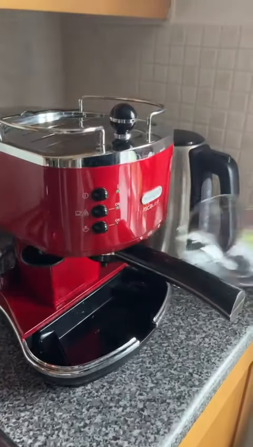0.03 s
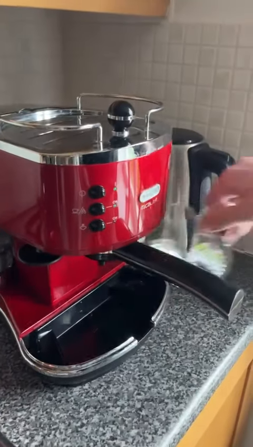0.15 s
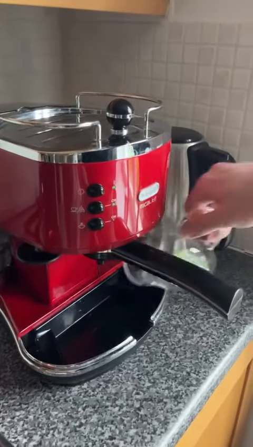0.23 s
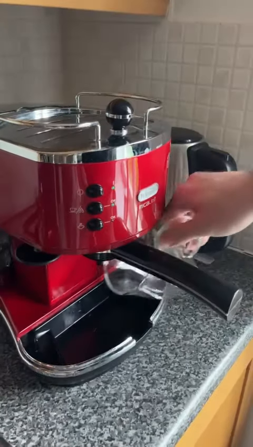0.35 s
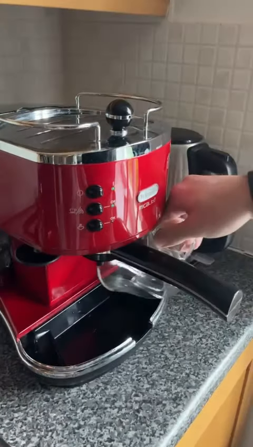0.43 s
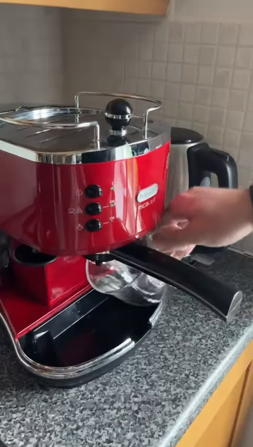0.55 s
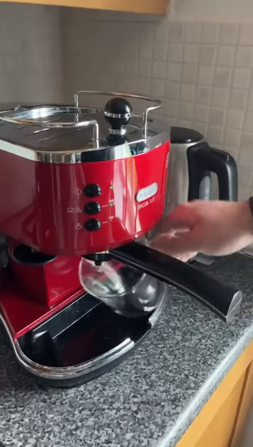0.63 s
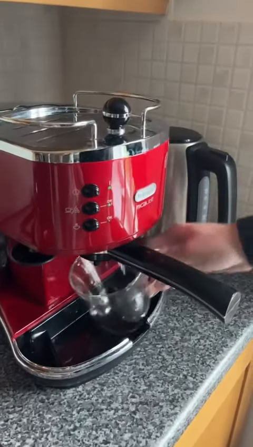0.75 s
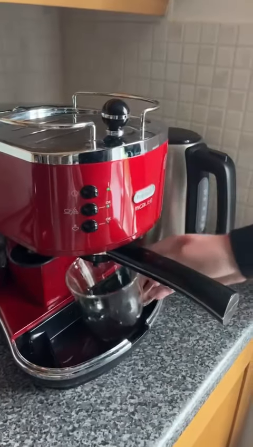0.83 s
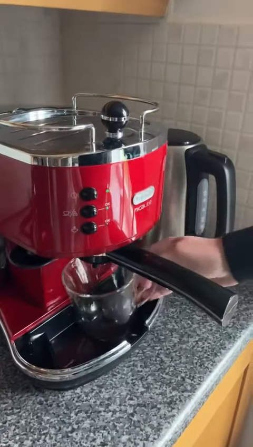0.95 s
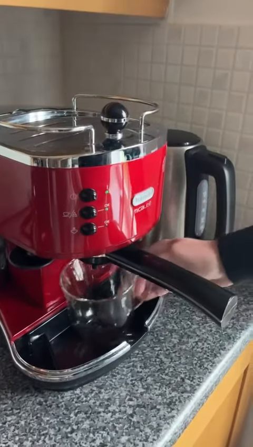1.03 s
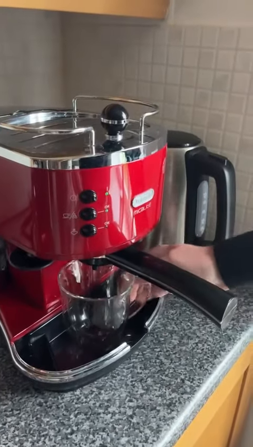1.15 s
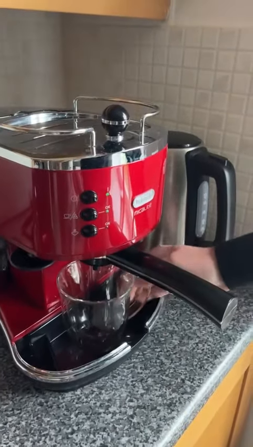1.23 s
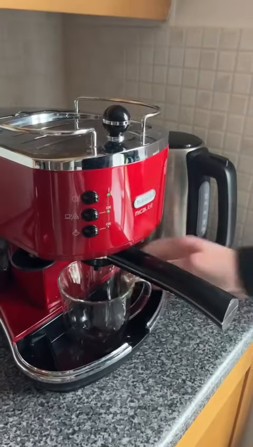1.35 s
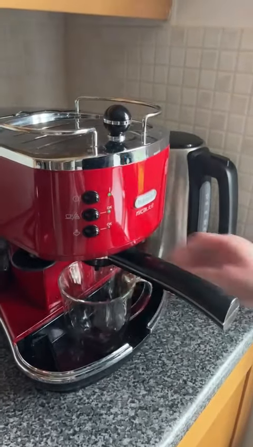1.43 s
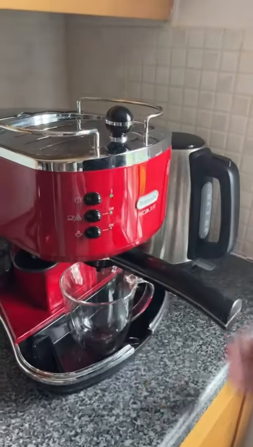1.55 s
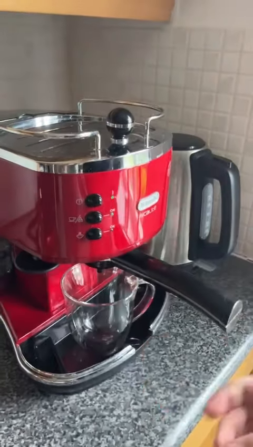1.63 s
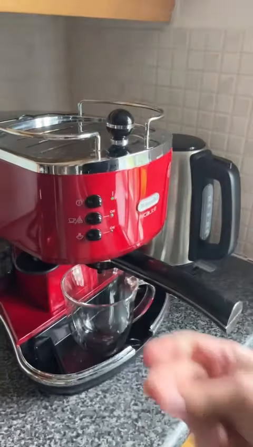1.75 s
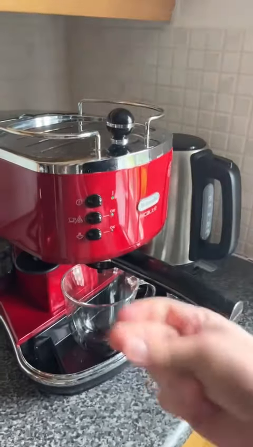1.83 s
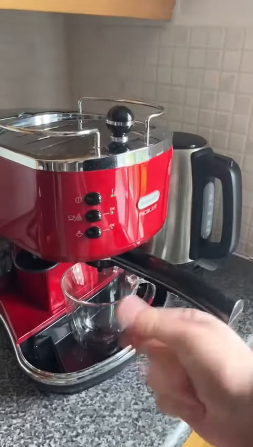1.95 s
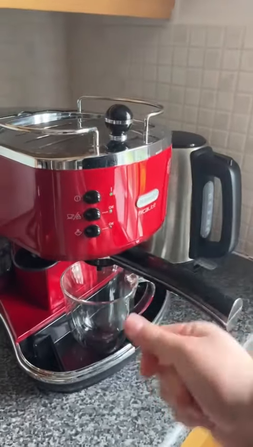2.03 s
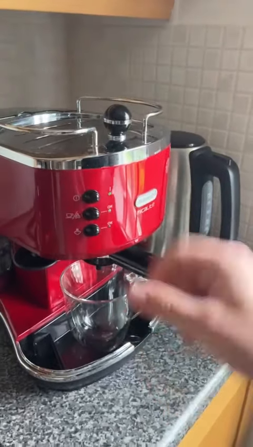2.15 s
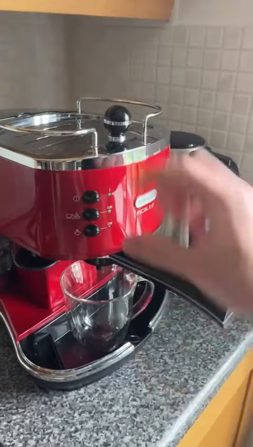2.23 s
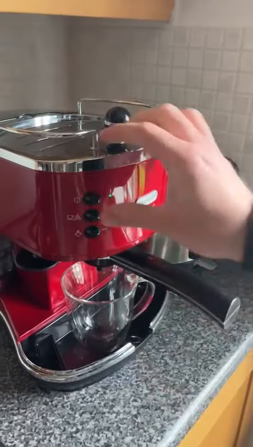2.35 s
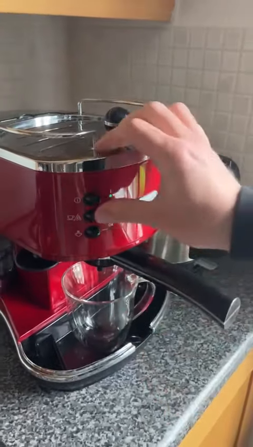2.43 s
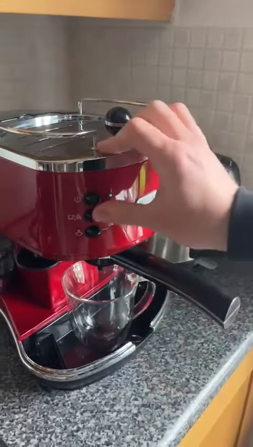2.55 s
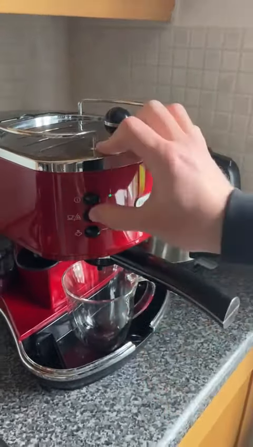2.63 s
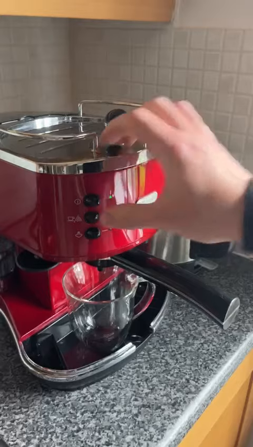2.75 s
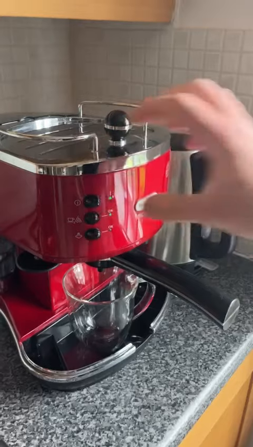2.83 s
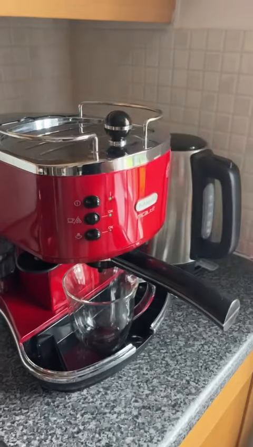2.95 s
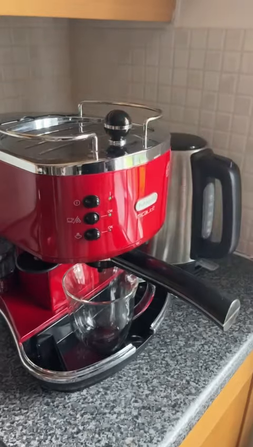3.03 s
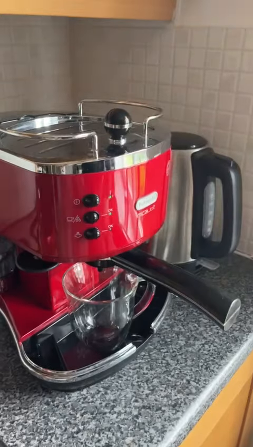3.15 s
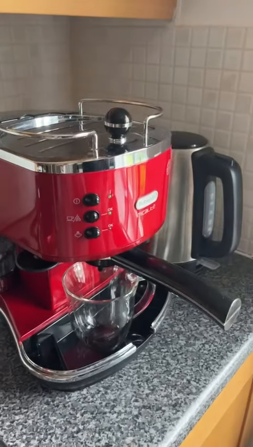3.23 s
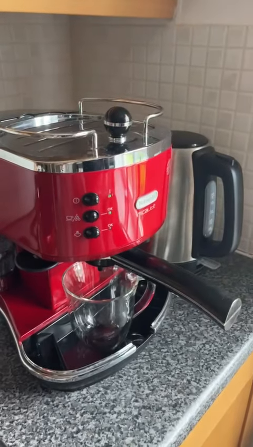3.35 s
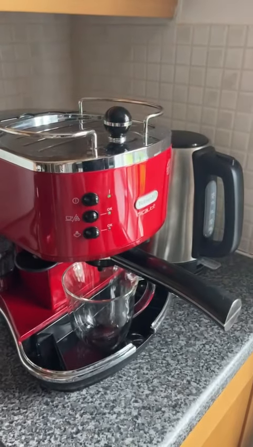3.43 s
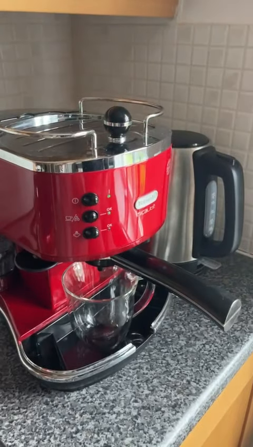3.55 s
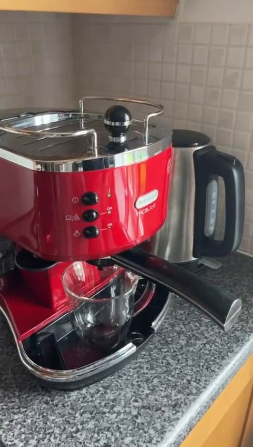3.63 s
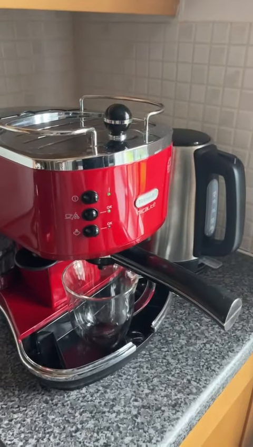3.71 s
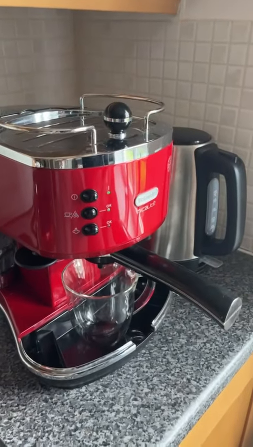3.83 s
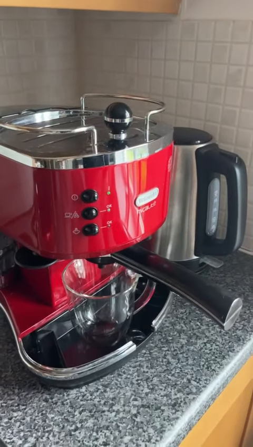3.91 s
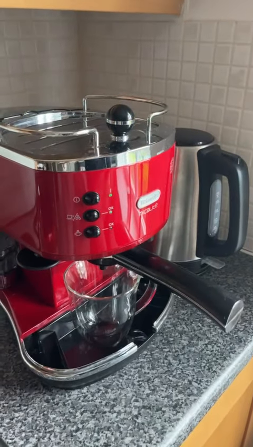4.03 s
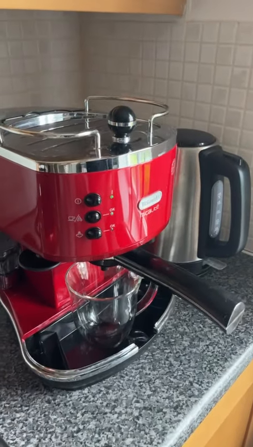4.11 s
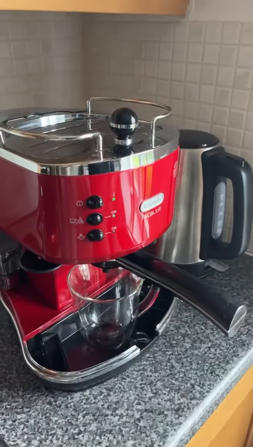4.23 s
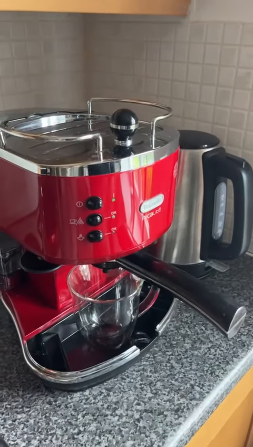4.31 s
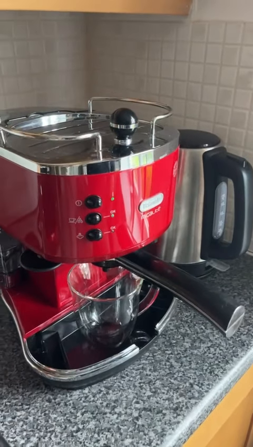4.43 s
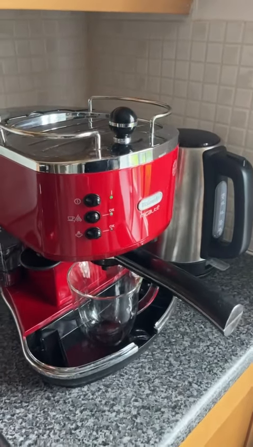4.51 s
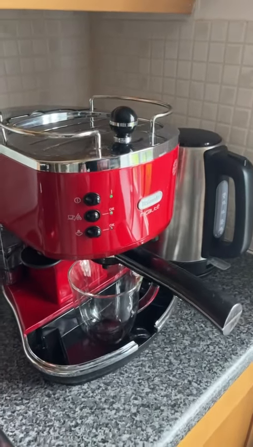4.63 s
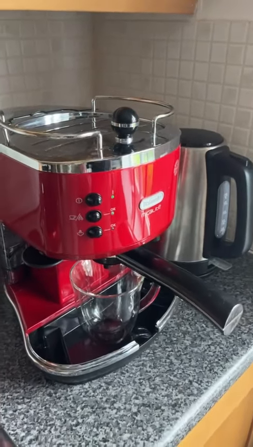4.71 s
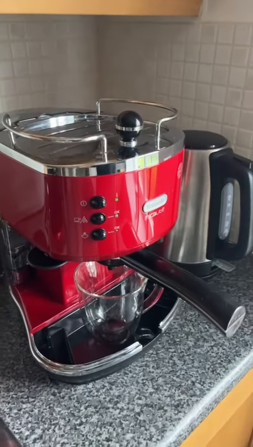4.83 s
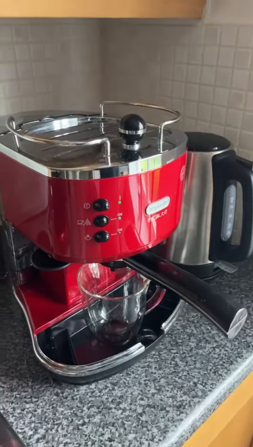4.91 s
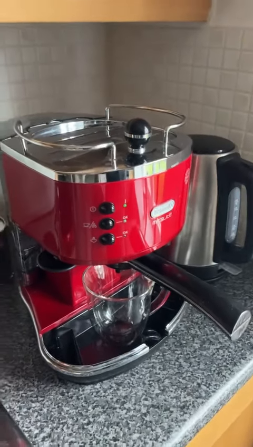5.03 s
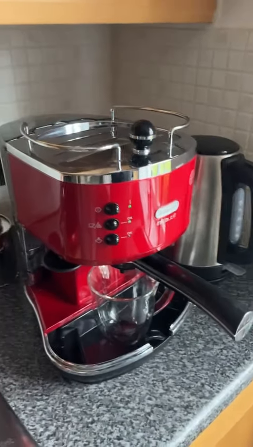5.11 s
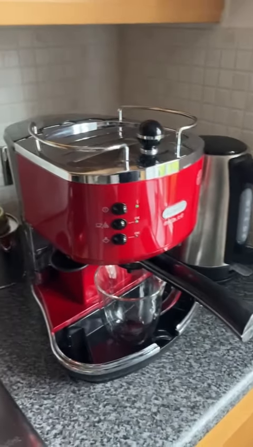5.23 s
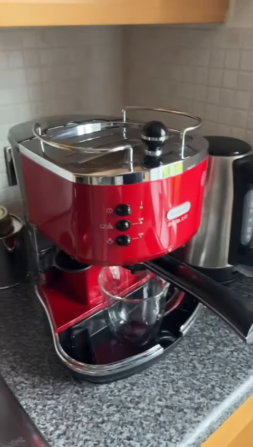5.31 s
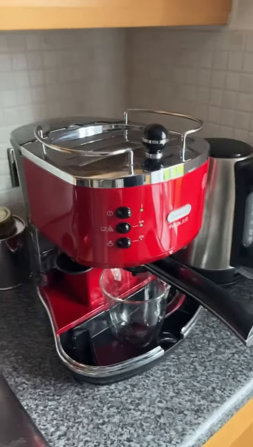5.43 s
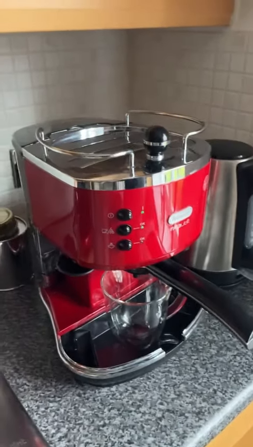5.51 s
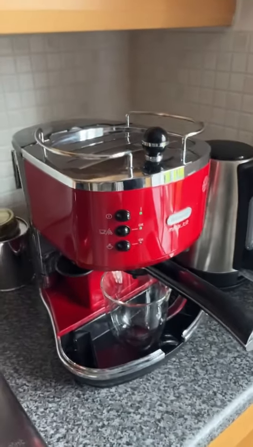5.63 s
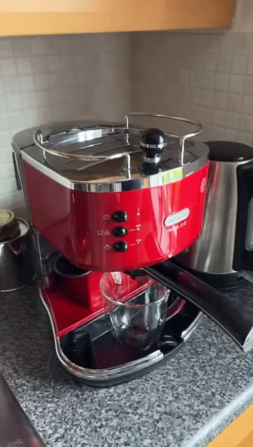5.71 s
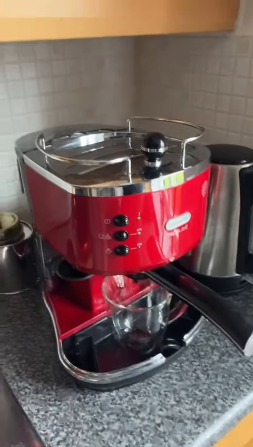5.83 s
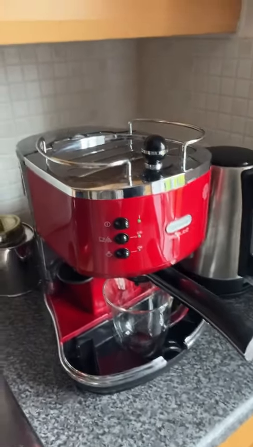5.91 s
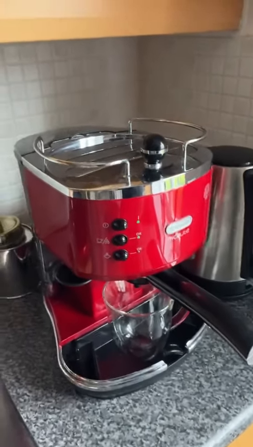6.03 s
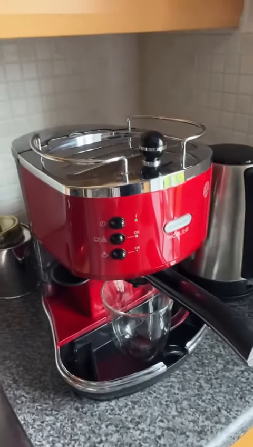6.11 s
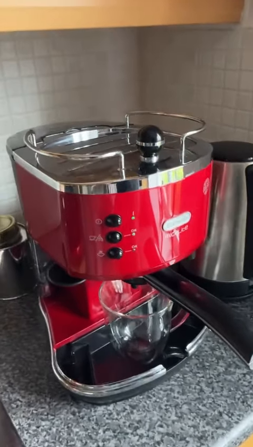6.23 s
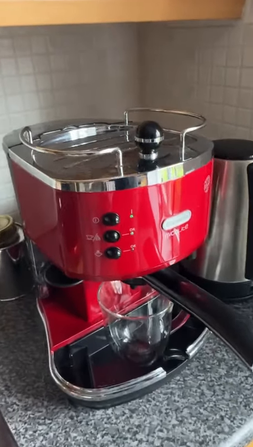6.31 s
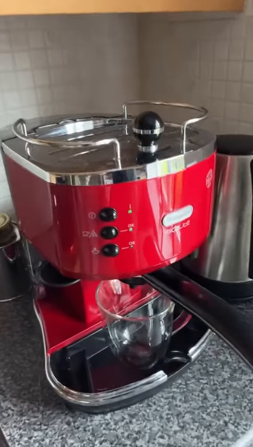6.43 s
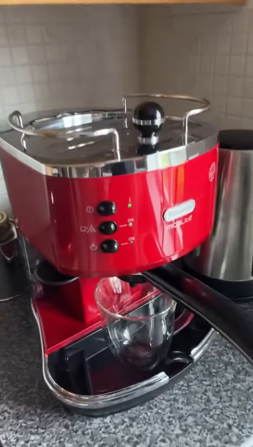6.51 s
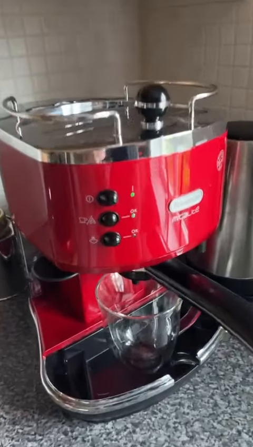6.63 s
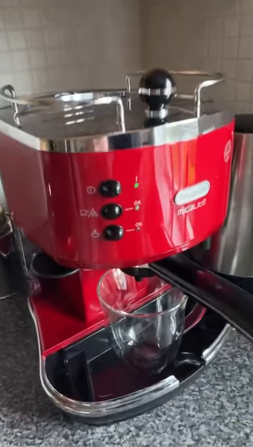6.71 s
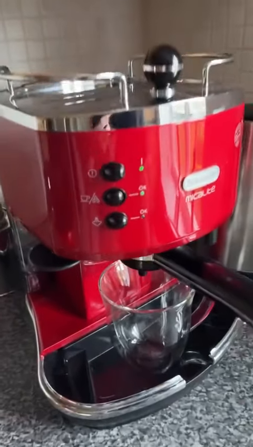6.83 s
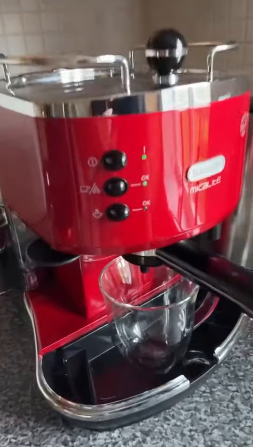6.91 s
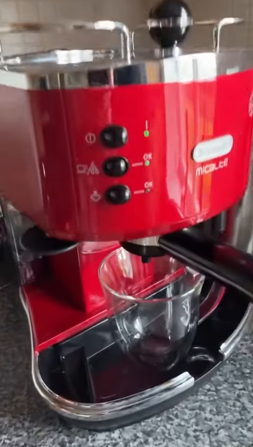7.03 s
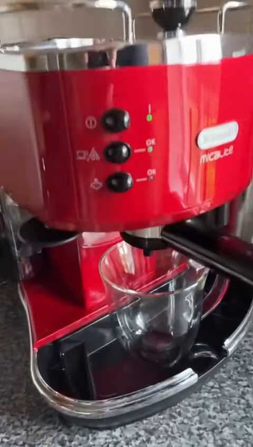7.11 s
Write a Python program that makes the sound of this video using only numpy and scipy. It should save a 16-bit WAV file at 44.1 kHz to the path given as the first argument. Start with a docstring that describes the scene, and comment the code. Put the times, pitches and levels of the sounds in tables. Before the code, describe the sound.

Glass clatters on a coffee machine's drip tray, one sharp finger snap, a switch click, and a harsh rattling pump drone that runs to the end.

```python
"""A small kitchen: a glass cup is knocked about on the drip tray of an espresso machine; tray and glass
ring as decaying modes. Fingers snap, a button is pressed, and the vibrating pump starts: its piston hums
at the mains rate (sines), clacks against the housing (struck resonances) and buzzes (shaped noise).
The hum swells as it primes and sinks as pressure builds; near the end the listener steps aside and leans
in, and the hum wavers and spreads between the ears. Under it lie room noise and a rustling sleeve."""
import sys
import numpy as np
from scipy import signal
from scipy.fft import rfft, irfft, next_fast_len
from scipy.io import wavfile

SR = 44100
rng = np.random.default_rng(int(sys.argv[2]) if len(sys.argv) > 2 else 0)


def to_wav(s):
    """Save 16-bit WAV."""
    ch = np.atleast_2d(s).T  # columns
    pcm = np.round(np.clip(ch, -1, 1) * 32767)  # PCM
    wavfile.write(sys.argv[1], SR, pcm.astype(np.int16))


N = 315756
TIME = np.arange(N) / SR
STROKE_HZ, PUMP_ON_S = 50.02, 2.5715

# cup against machine and tray, and last two faint low thumps, relative levels: start_s, thud_db, body_db,
# crack_db, tick_db, boom_db, hollow_db, then the note of the struck spot: pitch_hz, level_db
KNOCKS = [(0.182, -25, -23.5, -32.5, -34, -59.5, -23, 1220, -28.5),
          (0.341, -24.5, -23.5, -27, -37.5, -56, -28, 444, -27.5),
          (0.363, -28.5, -35, -44.5, -54.5, -54.5, -44, 1425, -41),
          (0.391, -22.5, -10.5, -20, -19.5, -33.5, -36, 950, -24),
          (0.405, -37, -25, -41.5, -42.5, -42.5, -39.5, 1300, -27.5),
          (0.515, -45, -28.5, -27.5, -44, -61.5, -57, 1380, -31.5),
          (0.637, -25.5, -18, -22, -21, -52.5, -35, 1114, -23.5),
          (0.642, -33.5, -22.5, -31.5, -33, -49.5, -31, 759, -9),
          (0.647, -50, -34, -40.5, -39.5, -59.5, -50.5, 4700, -29.5),
          (0.658, -50, -33, -32, -44.5, -56.5, -48.5, 4720, -30.5),
          (0.667, -46, -30, -38, -54, -59.5, -48, 850, -34),
          (0.687, -51, -34.5, -38.5, -53, -58, -49.5, 3900, -37.5),
          (0.836, -38, -22.5, -28.5, -36.5, -37.5, -54.5, 680, -26.5),
          (0.969, -43, -21.5, -18.5, -36, -34.5, -58, 604, -23),
          (0.973, -43, -24.5, -33.5, -53, -46.5, -52.5, 1360, -26),
          (0.994, -40, -20.5, -25, -45, -32.5, -54, 2050, -27),
          (1.036, -47, -37, -48, -60, -50.5, -62, 1550, -40),
          (1.115, -45, -22.5, -29.5, -51, -53.5, -63, 525, -33),
          (1.207, -58, -36, -52, -66, -48, -65, 600, -41),
          (1.234, -55, -35, -42.5, -63, -56.5, -68, 1330, -55),
          (1.262, -63, -47, -56, -70, -61, -68, 765, -55), (1.359, -59, -53, -78, -70, -61, -64, 497, -56),
          (1.635, -57.5, -64, -84, -77.5, -62.5, -67, 118, -46.5)]
# decay of the kitchen: pitch_hz, t60_s
KITCHEN_T60 = [(100, 0.57), (1000, 0.26), (4000, 0.078), (10000, 0.091)]
# side against mid at the microphones: pitch_hz, level_db
WIDTH = [(60, -39), (120, -29), (350, -6), (630, -3.5), (1200, -5.5), (2000, -0.5), (3600, -0.5),
         (5500, 12), (8000, -2), (11000, -13.5)]


def from_db(db):
    """Decibels to gain."""
    return np.exp(np.asarray(db) * np.log(10) / 20)


def rms_one(x):
    """Scale to rms 1; for stereo, the mean of both channels counts."""
    return x / np.sqrt(np.mean(np.atleast_2d(x).mean(axis=0) ** 2) + 1e-20)


def at_hz(points, hz):
    """Read a table on a log-frequency axis."""
    f, value = np.transpose(points)
    return np.interp(np.log(np.maximum(hz, 1)), np.log(f), value)


def filtered(x, order, hz, kind):
    """Butterworth filter; a band takes its two edges."""
    return signal.sosfilt(signal.butter(order, hz, kind, fs=SR, output="sos"), x)


def ramp(start_s, length_s):
    """Rises evenly from 0 to 1 and stays there."""
    return np.clip((TIME - start_s) / length_s, 0, 1)


def stepped_aside():
    """The listener steps aside."""
    return ramp(5.21, 0.72)


def leaned_in():
    """The listener leans in."""
    return ramp(5.7, 1.3)


def widened():
    """The sound opens wide between the ears."""
    return ramp(5.91, 0.087)


def swells(moves):
    """Sum of bell-shaped bumps in time."""
    return lambda height: sum(height(db) * np.exp(-((TIME - s) / half_s) ** 2) for s, half_s, db in moves)


def drift(rate):
    """Slow random wander of spread 1; a higher rate wanders faster."""
    r = np.exp(-200 * np.pi * rate / SR)
    # drawn once per 100 samples, after a run-in
    slow = signal.lfilter([1], [1, -2 * r, r * r], rng.standard_normal(N // 100 + 1002))[1000:]
    return np.interp(np.arange(N) / 100, np.arange(len(slow)), rms_one(slow))


def white():
    """Two unrelated white noises."""
    return rng.standard_normal((2, N))


def coloured(pair, spectrum):
    """Two noises as mid and side take on the spectrum and become left and right; mid has rms 1."""
    size = next_fast_len(N, real=True)
    hz = np.arange(size // 2 + 1) * SR / size
    # roll off beyond both ends of the table
    ends = np.minimum(1, spectrum[-1][0] / (hz + 1)) ** 4 * np.minimum(1, hz / spectrum[0][0]) ** 2
    mid, side = rfft(pair, size) * from_db(at_hz(spectrum, hz)) * ends
    side = side * from_db(at_hz(WIDTH, hz))
    return rms_one(irfft(np.array([mid + side, mid - side]), size)[:, :N])


def clicks(times, gains):
    """Single-sample blows."""
    out = np.zeros(N)
    out[np.clip(np.round(np.asarray(times) * SR).astype(int), 0, N - 1)] = gains
    return out


def ring(blows, hz, t60):
    """Two-pole resonance: a unit blow sets a dying sine of height 1 ringing."""
    r, w = from_db(-60 / (t60 * SR)), 2 * np.pi * hz / SR
    return signal.lfilter([0, np.sin(w)], [1, -2 * r * np.cos(w), r * r], blows + 1e-18)


def fading(blows, t60):
    """An envelope that jumps at each blow and dies away; overlapping blows add in power."""
    return np.sqrt(signal.lfilter([1], [1, -from_db(-120 / (t60 * SR))], blows ** 2 + 1e-18))


def kitchen(x, wet_db):
    """Direct sound plus dense reflections from tiles and counter, unrelated left and right."""
    t = TIME[:SR // 2]
    tail = rng.standard_normal((2, len(t))) * from_db(-60 * t / at_hz(KITCHEN_T60, 1000)) * (t > .002)
    tail /= np.sqrt(np.sum(tail ** 2, axis=1, keepdims=True))
    return x + from_db(wet_db) * signal.fftconvolve(x[None], tail, axes=1)[:, :N]


def panned(x, left_db):
    """Lean a sound to the left."""
    return x * from_db(left_db * np.array([[1], [-1]]) / 2)


def pump():
    """Hum, clack, churning water, buzzing parts and valve hiss, all locked to the piston."""
    # brief level dips after the sound widens: center_s, half_length_s, level_db
    dips = [(6.0, 0.046, -13), (6.164, 0.055, -6), (6.433, 0.059, -4.5)]
    # strength of the clack at the listener: start_s, level_db
    clack_curve = [(2.6, -38), (2.93, -38.5), (3.15, -40.5), (3.8, -38), (4.6, -39), (4.78, -41.5),
                   (5.7, -36), (6.15, -38), (6.8, -35), (7.15, -37)]
    spread = 0.36 * stepped_aside() + 0.64 * widened()
    strokes = (TIME - PUMP_ON_S) * STROKE_HZ
    dip_db = swells(dips)(lambda db: db)

    hum_db = pump_level(-35, db_per_s=-1.42, dry_db=-19, aside_db=-3, wide_db=-0.5)
    drone = hum(strokes, hum_db + dip_db, widened(), stroke_db=-35.5, waver=1.0, ear_turn=0.021)

    times, force_db = piston(limp_s_per_s=0.000085, loose_s=0.00018, jitter_s=0.000065,
                             roaming_s=0.00003, uneven_db=1.15, late_db=0.5)
    hits = clack(times, force_db, uneven_db=2.2, echo_db=(-7.5, -12.5), wide_echo_db=6.0,
                 ear_lag_s=0.000079, panels_db=-52.5, chatter_db=-40.5)
    hits = from_db(np.interp(TIME, *np.transpose(clack_curve))) * hits
    bracket_db = pump_level(-45, db_per_s=-1, dry_db=-5, aside_db=-3, wide_db=-2.5)
    hits = hits + from_db(bracket_db) * bracket(times, force_db, rebound_db=-5.0)

    water = churn(strokes, dip_db, spread)
    parts = buzz(strokes, times, force_db, spread)
    total = drone + hits + water + parts + valve_hiss(strokes) + wash(strokes, spread)
    return total * np.clip(strokes + 0.5, 0, 1)  # fades in over one stroke


def pump_level(primed_db, db_per_s, dry_db, aside_db, wide_db):
    """Level in dB of one voice as the pump primes and builds pressure and the listener moves."""
    dry = 1 - ramp(PUMP_ON_S, 0.32)  # the pump starts dry and draws water within this time
    pumped_s = np.maximum(TIME - PUMP_ON_S, 0)
    moved_db = aside_db * stepped_aside() + wide_db * widened()
    return primed_db + db_per_s * pumped_s + dry_db * dry + moved_db


def hum(strokes, hum_db, spread, stroke_db, waver, ear_turn):
    """The piston shakes the housing at the stroke rate and its multiples; waver, ear_turn in radians."""
    # partials: multiple of the stroke rate, level_db
    partials = [(3, -6.5), (4, 1.5), (5, -13), (6, -1), (7, -12), (8, -3.5), (9, -9), (10, -18), (11, -6.5),
                (12, -11), (13, -18.5), (14, -10), (15, -14), (16, -15), (18, -18), (20, -10)]

    def wobble(depth):
        """Phase wander, separate for each ear."""
        return depth * spread * np.array([drift(16.0) for ear in range(2)])

    out = from_db(stroke_db) * np.sin(2 * np.pi * strokes + wobble(waver))
    sway = wobble(0.53)
    for order, db in partials:
        between_ears = ear_turn * order * np.array([[1], [-1]])
        turn = (sway + between_ears) * rng.choice([-1, 1])
        phase = 2 * np.pi * (order * strokes + rng.random()) + turn
        out = out + from_db(hum_db + db + .5 * drift(3.4)) * np.sin(phase)
    return out


def piston(limp_s_per_s, loose_s, jitter_s, roaming_s, uneven_db, late_db):
    """Times and force (dB) of the hits; as pressure builds every other one comes later and a bit harder."""
    lead_s = 0.001953  # blow placed early so that the casing's ring peaks on the beat
    gained_s = 0.0009  # the clack arrives sooner as the listener leans in
    settle_s = 1.6     # the timing steadies within this time
    k = np.arange(int((N / SR - PUMP_ON_S) * STROKE_HZ) + 1)
    pumped_s, late = k / STROKE_HZ, k % 2 == 0
    beat = PUMP_ON_S + pumped_s
    chance = rng.standard_normal((len(k), 2))
    near, wide = np.interp(beat, TIME, leaned_in()), np.interp(beat, TIME, widened())
    scatter_s = np.interp(pumped_s, [0, settle_s], [loose_s, jitter_s]) + roaming_s * wide
    times = beat - lead_s - gained_s * near + limp_s_per_s * pumped_s * late + scatter_s * chance[:, 0]
    # every sixth stroke stands out by up to 1.5 dB as the listener leans in
    surge_db = 1.5 * (k % 6 == 5) * near
    return times, late_db * late * pumped_s / pumped_s[-1] + surge_db + uneven_db * chance[:, 1]


def clack(times, force_db, uneven_db, echo_db, wide_echo_db, ear_lag_s, panels_db, chatter_db):
    """Each hit rings the casing and its panels and bounces twice between the tiled walls of the corner."""
    # panels rung by the piston: pitch_hz, level_db, t60_s
    panel_modes = [(1180, 5.5, 0.37), (1247.7, 3.5, 0.34), (1384, -3, 0.36), (1428, -8, 0.12),
                   (1526, 3, 0.26), (1565, 3, 0.22)]
    flutter_s, shrink_s = 0.00722, 0.00037  # bounce spacing, and how much it closes on leaning in
    near, wide = np.interp(times, TIME, leaned_in()), np.interp(times, TIME, widened())
    hits = clicks(times, from_db(force_db))
    # loose parts chatter on between the hits and keep the casing ringing
    chatter = from_db(chatter_db) * rng.standard_normal(N) * (TIME > PUMP_ON_S)
    panels = sum(from_db(panels_db + db) * ring(hits + chatter, hz, t60) for hz, db, t60 in panel_modes)
    heard = kitchen(hits + panels + chatter, wet_db=-17.0)
    # as the sound widens the echoes grow and reach the left ear first
    for bounce, db in enumerate(echo_db, 1):
        chance_db = uneven_db * rng.standard_normal(len(times))
        gains = from_db(force_db + db + wide_echo_db * wide + chance_db)
        arrival = times + bounce * (flutter_s - shrink_s * near)
        heard = heard + np.array([clicks(arrival + ear * ear_lag_s * wide, gains) for ear in (-1, 1)])
    return rms_one(filtered(heard, 3, (1256, 1570), "band"))  # broad resonance of the casing


def bracket(times, force_db, rebound_db):
    """The clack and its rebound keep a small metal part singing."""
    # modes of the part: pitch_hz, level_db, t60_s
    metal_modes = [(2237, -9, 0.11), (2297.4, -6, 0.1), (2330, -11, 0.087)]
    rebound_s = 0.00396
    hits = clicks(times, from_db(force_db)) + clicks(times + rebound_s, from_db(force_db + rebound_db))
    tone = sum((-1) ** k * from_db(db) * ring(hits, hz, t60)
               for k, (hz, db, t60) in enumerate(metal_modes))
    return rms_one(kitchen(tone, wet_db=-6.0))


def rattle(strokes, repeat):
    """Fine rattling noise; the share repeat (of power) recurs exactly every second stroke."""
    repeat = np.clip(repeat, 0, 1)
    place = (strokes % 2 * SR / STROKE_HZ).astype(int)
    pattern = rng.standard_normal((2, SR // 10))[:, place]
    return np.sqrt(repeat) * pattern + np.sqrt(1 - repeat) * white()


def bursts(strokes, lead, length, between_db, uneven_db):
    """A surge in each stroke: starts lead before the beat, peaks length later (strokes), dies away."""
    cycle = strokes + lead
    number = (cycle - np.floor(cycle[0])).astype(int)
    force = from_db(uneven_db * rng.standard_normal(N // 100))[number]
    age = (cycle % 1) / length
    return from_db(between_db) + force * age * np.exp(1 - age)


def churn(strokes, dip_db, spread):
    """Churning and gurgling water: rattling noise in two low-middle spectra."""
    # noise spectra: pitch_hz, level_db per Hz
    churn_spectrum = [(25, -10), (70, 0), (120, -11), (170, -1.5), (205, -4.5), (233, 6), (262, -0.5),
                      (325, -1.5), (362, -5.5), (410, -2.5), (470, -3.5), (900, -45)]
    gurgle_spectrum = [(380, -22), (470, -9), (520, 1), (545, -8), (573, 2), (615, 0.5), (645, -2),
                       (680, 1), (740, 4), (775, -6), (845, -6), (900, -3), (1000, -1.5), (1500, -10.5),
                       (1900, -34)]
    churn_db = pump_level(-40, db_per_s=-1, dry_db=0, aside_db=2, wide_db=-0.5) + 0.63 * dip_db
    out = from_db(churn_db) * coloured(rattle(strokes, repeat=0.17), churn_spectrum)
    gurgle_db = pump_level(-39.5, db_per_s=-1.36, dry_db=2, aside_db=-1, wide_db=2) + dip_db
    gurgle_db = gurgle_db + 1.5 * spread * drift(9.6)
    return out + from_db(gurgle_db) * coloured(rattle(strokes, repeat=0.24), gurgle_spectrum)


def fittings(times, force_db, t60):
    """The crowded modes of the fittings answer every hit with the same short ring of noise."""
    t = TIME[:SR // 10]
    answer = rng.standard_normal((2, len(t))) * from_db(-60 * t / t60)
    hits = clicks(times, from_db(force_db))
    return rms_one(signal.fftconvolve(hits[None], answer, axes=1)[:, :N])


def buzz(strokes, times, force_db, spread):
    """Loose parts rattle in a burst per stroke, and the fittings answer each hit."""
    # noise spectra, the second heard close to the housing: pitch_hz, level_db per Hz
    buzz_spectrum = [(600, -29), (850, -12), (1000, 1), (1400, 12), (1580, -1), (1700, 1.5), (1900, 5),
                     (2150, 3), (2280, 7), (2450, 2), (3100, 3), (3550, 1.5), (3900, -4.5), (5000, -7),
                     (5700, -59), (7000, -116)]
    close_spectrum = [(1800, 11.5), (3000, -22), (3800, -8), (4300, 3), (4800, -4), (5600, -22.5)]
    grain = rattle(strokes, repeat=0.14)
    loose = rms_one(grain * bursts(strokes, lead=.11, length=0.2, between_db=-3, uneven_db=1.8))
    answer = from_db(-3.5) * fittings(times, force_db, t60=0.13)
    level_db = pump_level(-39.5, db_per_s=0, dry_db=4, aside_db=-2, wide_db=-3.5)
    out = from_db(level_db) * coloured(loose + answer, buzz_spectrum)
    # each clack carries a short, thin buzz that comes through as the sound spreads
    close = grain * bursts(strokes, lead=.09, length=0.07, between_db=-9, uneven_db=2.5)
    return out + from_db(-46.5) * spread * coloured(close, close_spectrum).mean(axis=0)


def valve_hiss(strokes):
    """The valve hisses in a high burst of noise each stroke."""
    # noise spectrum: pitch_hz, level_db per Hz
    valve_spectrum = [(5500, -107), (6900, -2.5), (7600, 12.5), (9000, 12.5), (10800, 7), (12000, -69)]
    hiss = white() * bursts(strokes, lead=0.34, length=0.21, between_db=-4.5, uneven_db=4.0)
    level_db = pump_level(-55, db_per_s=1.04, dry_db=4.5, aside_db=-6.5, wide_db=2.5)
    return from_db(level_db) * coloured(hiss, valve_spectrum)


def wash(strokes, spread):
    """A wash of similar rattling, opposite in the two ears, grows as the sound widens."""
    # noise spectrum: pitch_hz, level_db per Hz
    wide_spectrum = [(18, -43), (30, -28), (59, -7), (114, -10), (191, -4), (376, -5), (560, -4.5),
                     (802, -13), (1000, -6.5), (1240, -10), (1350, 2.5), (1740, -28), (2930, -10),
                     (3500, -22), (4550, -54), (7700, -120)]
    noise = coloured(rattle(strokes, repeat=0.11), wide_spectrum).mean(axis=0)
    return from_db(-31.0) * spread * noise * [[1], [-1]]


def cup():
    """Each knock rings the tray and rocks the machine; the glass sings when its rim is caught."""
    # modes of plastic tray, glass, machine rocking on its feet, and the hollow of its housing:
    # pitch_hz, level_db, t60_s
    tray_modes = [(174, -19.5, 0.27), (326.5, -3, 0.3), (352, -2, 0.22), (385, 1, 0.1), (557, -0.5, 0.22),
                  (628, 6.5, 0.051), (718.4, -1.5, 0.12), (840, -5, 0.072), (917, -8.5, 0.15),
                  (1197, -8.5, 0.069), (1380, -8, 0.15), (1580, -6, 0.1), (1830, -13, 0.15),
                  (2232, -6, 0.079), (2560, -8, 0.046), (3310, -5.5, 0.061), (3080, -5, 0.047),
                  (3900, -0.5, 0.044)]
    glass_modes = [(748, -7, 0.33), (815, 1, .08), (940, -1, 0.047), (2078, 0, 0.25), (2934, -9, .09),
                   (2975, -11, .08), (3477, -12.5, 0.26), (3876, -12, 0.11), (4247, -14, .09),
                   (4655, -18, 0.08), (7450, -26, .2), (7822, -19, 0.07), (7990, -32, 0.3),
                   (8450, -34, .22), (9400, -34, .18)]
    feet_modes = [(76, -3.5, 0.93), (85.6, -13.5, .5), (130, -15.5, .35), (174, 6, 0.12)]
    hollow_modes = [(346.4, -2, 0.27), (396, -4, 0.18)]
    held_db, rim_db, rim_caught_s = -30.5, -2.5, 0.637  # glass muffled by the hand, or ringing freely
    times, _, body_db, _, _, boom_db, hollow_db, spot_hz, spot_db = np.transpose(KNOCKS)

    def rung(level_db, modes):
        """All modes struck by every knock."""
        return sum(ring(clicks(times, from_db(level_db + db)), hz, t60) for hz, db, t60 in modes)

    on_rim = np.arange(len(times)) == np.argmin(abs(times - rim_caught_s))
    tray = 0
    for k, (hz, db, t60) in enumerate(tray_modes):
        # every knock lands on another spot and favours other modes
        blows = clicks(times, from_db(strength_db(KNOCKS, hz) + db + rng.normal(0, 3.9, len(times))))
        tray = tray + (-1) ** k * ring(blows, hz, t60)
    boom = rung(boom_db, feet_modes)
    glass = rung(body_db + np.where(on_rim, rim_db, held_db), glass_modes)
    hollow = rung(hollow_db, hollow_modes)
    # the struck spot rings briefly
    spots = sum(ring(clicks([s], from_db(db)), hz, t60=0.065)
                for s, hz, db in zip(times, spot_hz, spot_db))
    bright = kitchen(from_db(-7.0) * tray + spots + glass, wet_db=-6.5)
    return bright + filtered(hollow + boom, 2, 55, "high")


def strength_db(rows, hz):
    """How hard each contact drives a frequency: soft ones thud, hard ones crack."""
    # centres of thud, body, crack and tick: pitch_hz
    centre_hz = [320, 850, 2700, 9000]
    return np.array([np.interp(np.log(hz), np.log(centre_hz), row[1:5]) for row in rows])


def contacts(rows, level_db, tail_db):
    """Crowded short modes of plastic parts as noise, band by band, followed by the room."""
    # colour common to all contacts: pitch_hz, level_db
    colour = [(70, -28.5), (150, -3), (320, -2.5), (800, -9), (1400, -7), (2700, -3), (4200, -6.5),
              (6200, -23), (8500, 20), (11000, -12)]
    # dying of the dense ring: pitch_hz, t60_s
    ring_t60 = [(100, 0.094), (400, 0.04), (1200, 0.014), (4000, 0.042), (10000, 0.0039)]
    size = int(2.9 * SR)  # by then the last touch has died away
    times = [row[0] for row in rows]
    noise = rng.standard_normal((2, 2, size))
    edges = 60 * 2 ** (np.arange(16) * 7.65 / 15)  # Hz
    # the parts grate as they touch, so each contact dies away unevenly
    grating = from_db(2.3 * drift(130))[:size]
    keep = np.exp(-1 / (0.0013 * SR))  # softened onset: each contact builds up over about 1.3 ms
    out = 0
    for k, (low, high) in enumerate(zip(edges, edges[1:])):
        hz = np.sqrt(low * high)
        gains = from_db(strength_db(rows, hz) + at_hz(colour, hz) + level_db)
        blows = clicks(times, gains)[:size]
        envelope = fading(blows, at_hz(ring_t60, hz))
        envelope = envelope + from_db(tail_db) * fading(blows, at_hz(KITCHEN_T60, hz))
        envelope = signal.lfilter([1 - keep], [1, -keep], envelope) * grating
        # even out the noise power between narrow and broad bands
        band = filtered(noise[k % 2] * envelope, 2, [low, high], "band")
        mid, side = band * np.sqrt(SR / 2 / (high - low))
        out = out + mid + from_db(at_hz(WIDTH, hz)) * side * [[1], [-1]]
    return np.pad(out, ((0, 0), (0, N - size)))


def finger_snap():
    """The finger slaps the palm with a sharp crack and rings the hollow under it."""
    # snap: start_s, level_db
    snaps = [(1.967, -22)]
    # hollow of the palm: pitch_hz, level_db, t60_s
    palm_modes = [(750, -12, 0.014), (1880, -12, 0.014), (1976, 0, 0.024), (2140, -3, 0.018),
                  (4390, -0.5, 0.0074), (4880, -6, 0.014), (5030, -7.5, 0.012), (9380, -6, 0.0049),
                  (10170, -2.5, 0.006), (10780, -3.5, 0.0054)]
    blow = clicks([s for s, db in snaps], from_db([db for s, db in snaps]))
    hollow = sum(ring(blow, hz, t60) * from_db(db) for hz, db, t60 in palm_modes)
    hollow = filtered(hollow, 1, 1000, "high")
    crack = from_db(-7.5) * fading(blow, t60=0.04) * rng.standard_normal(N)
    crack = filtered(crack, 2, 3500, "high")
    return kitchen(hollow + crack, wet_db=-8.0)


def background():
    """Quiet kitchen noise, and a sleeve whose rustle swells and fades with each move of the arm."""
    # noise spectra: pitch_hz, level_db per Hz
    room_spectrum = [(15, -48), (25, -5.5), (96, 2), (156, -0.5), (208, 1), (440, -15.5), (541, -4.5),
                     (776, -21.5), (1090, -25), (2420, -45.5), (3660, -58), (4270, -30), (5250, -81.5),
                     (8800, -53.5), (12000, -68.5), (15600, -98), (22000, -120)]
    rustle_spectrum = [(300, -9.5), (800, 5.5), (2500, -9.5), (4400, -4.5), (6200, -29.5), (8500, -5.5),
                       (11000, -17)]
    # arm reaches in, draws back, finger slides onto the button: fastest_s, half_length_s, level_db
    arm_moves = [(0.353, 0.49, -65.5), (1.373, 0.22, -69.5), (2.455, 0.033, -63.5), (2.566, 0.025, -59)]
    moving = swells(arm_moves)(from_db)
    rustle = (from_db(-85.5) + moving) * from_db(1.5 * drift(13))
    return from_db(-53.5) * coloured(white(), room_spectrum) + rustle * coloured(white(), rustle_spectrum)


def scene():
    """Cup, snap, button and pump over the quiet room."""
    # finger on the button, then the switch, relative levels: start_s, thud_db, body_db, crack_db, tick_db
    button = [(2.415, -41.5, -47, -61, -84), (2.447, -69, -41, -54, -54), (2.513, -62, -48, -50.5, -87),
              (2.572, -60, -46, -29, -43), (2.590, -38, -37, -80, -27.5)]
    touches = contacts(list(KNOCKS) + list(button), level_db=-4.5, tail_db=-8.5)
    bearing_db = -1.5 * stepped_aside()  # the machine ends up a little to the right
    return cup() + touches + finger_snap() + panned(pump(), bearing_db) + background()


def record(dry):
    """The two microphones differ a little in colour and arrival time; rumble and the top are cut."""
    # the left hears more of the low middle: pitch_hz, left_minus_right_db
    lean = [(110, 0.2), (190, 0.6), (350, 1.5), (630, 3), (1150, 0.7), (2000, 2), (3700, -1.5), (7000, 0.3),
            (11000, 0.3)]
    right_lag_s, cutoff_hz = .000012, 11450
    size = next_fast_len(N + SR // 10, real=True)
    hz = np.arange(size // 2 + 1) * SR / size
    ports = panned(rfft(dry, size), at_hz(lean, hz))
    ports[1] *= np.exp(-2j * np.pi * hz * right_lag_s)
    heard = filtered(irfft(ports, size)[:, :N], 2, 28, "high")
    return signal.sosfilt(signal.ellip(10, .2, 80, cutoff_hz, fs=SR, output="sos"), heard)


dry = scene()
out = record(dry)
to_wav(out)
```